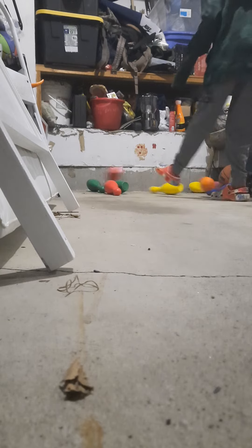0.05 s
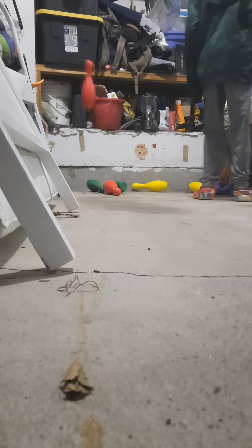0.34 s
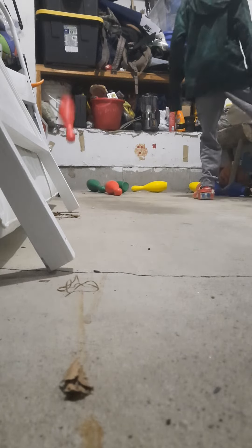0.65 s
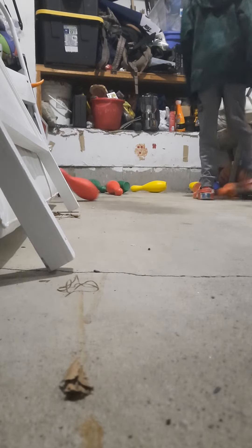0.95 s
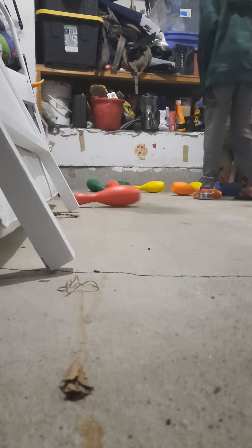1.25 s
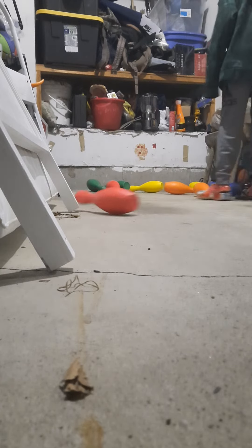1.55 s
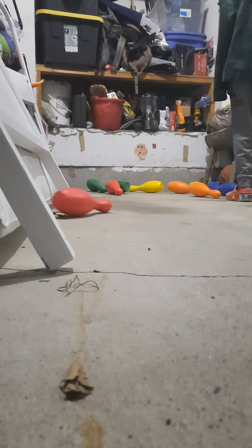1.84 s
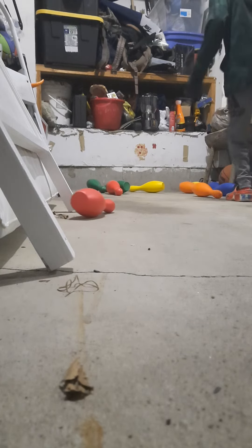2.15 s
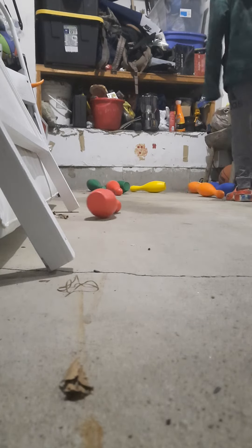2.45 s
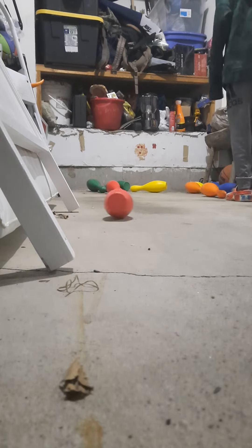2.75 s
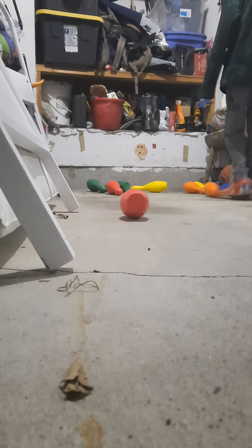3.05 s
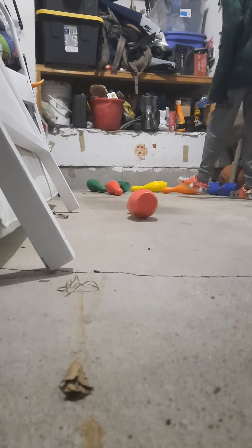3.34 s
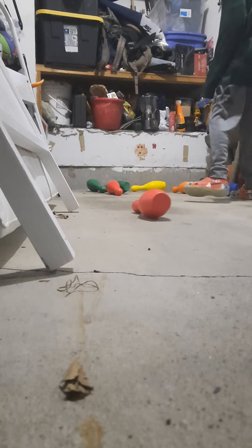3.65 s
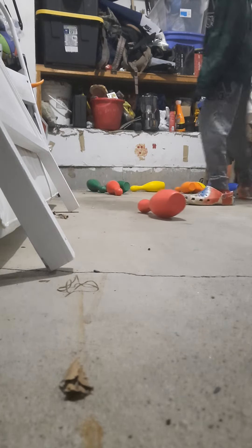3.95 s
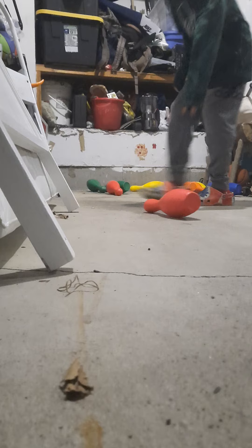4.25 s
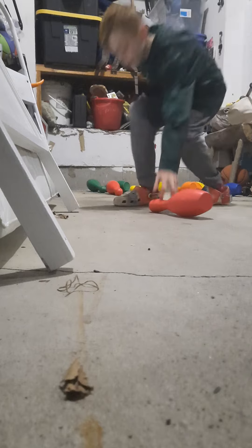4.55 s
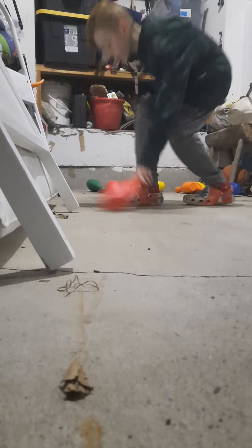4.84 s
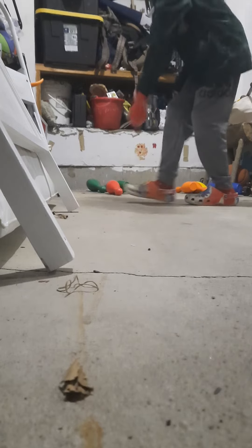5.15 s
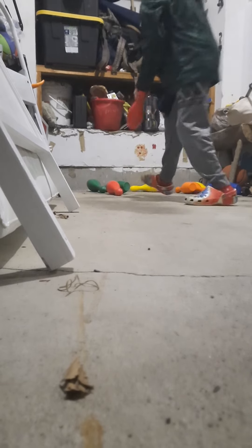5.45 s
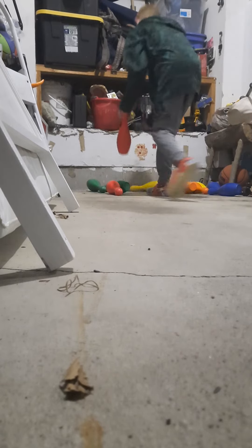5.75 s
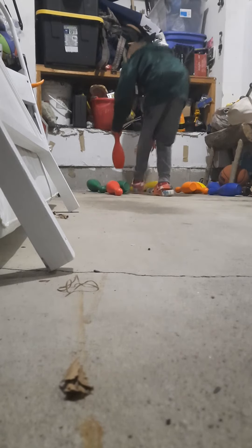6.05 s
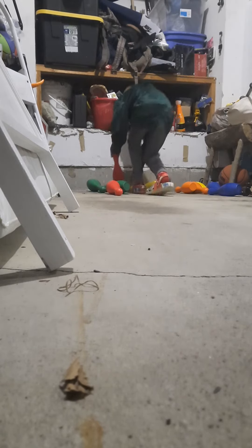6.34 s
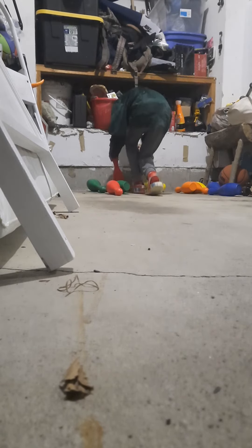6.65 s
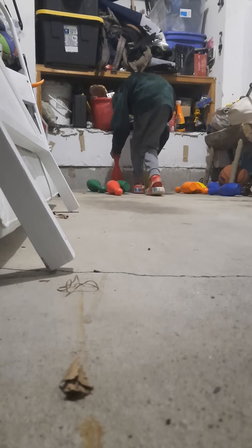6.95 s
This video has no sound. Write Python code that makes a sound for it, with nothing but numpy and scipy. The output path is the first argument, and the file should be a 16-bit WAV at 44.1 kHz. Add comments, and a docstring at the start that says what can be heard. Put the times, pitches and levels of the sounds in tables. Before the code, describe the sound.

Hollow plastic bowling pins knock and bounce on a concrete garage floor, with three sharp, booming tocks in the first half second and a gritty skid. Around 0.8 to 1.3 seconds comes another cluster of knocks with a loud scrape, then a pin rolls unevenly until about 2 seconds, tapping lightly. At 2.1 seconds a hard crack opens a quick, bright, ringing clatter, the loudest moment, with a rasping slide and sandy crunches until 2.5 seconds. Dull footsteps thud irregularly from about 1.3 seconds to the end, with soles scuffing the grit. Lighter pin knocks come near 3.2 and 4.5 seconds. From 5 seconds to about 7 there are only steps, soft shuffles and faint heel taps. The hard walls give everything a short echo, and a faint steady rush of air lies underneath.

```python
"""Hollow plastic bowling pins knock, bounce and skid as a child kicks them about a concrete garage.
Each impact excites a pin's thin wall and the air inside; one kick ends in a loud ringing clatter.
Soles and pins rasp over the gritty floor by friction; footsteps thud and heels tap on the slab.
The hard walls return every sound as early echoes and reverberation, over a faint rush of air."""
import sys
import numpy as np
from scipy import signal
from scipy.fft import rfft, irfft, next_fast_len
from scipy.io import wavfile

SR = 44100
rng = np.random.default_rng(int(sys.argv[2]) if len(sys.argv) > 2 else 0)


def materialize(psi):
    """Save the field psi as 16-bit PCM at rate SR to the path in sys.argv[1].

    A 1-D psi becomes a single channel; in a 2-D psi each row is a channel.
    """
    bounded = np.clip(np.atleast_2d(psi).T, -1, 1)
    quanta = np.round(bounded * 32767).astype(np.int16)
    wavfile.write(sys.argv[1], SR, quanta)


N = 308556


def amp(db):
    """Converts decibels to an amplitude ratio."""
    return 10 ** (np.asarray(db) / 20)


def unit(x):
    """Normalises to a mean energy of 1 per channel."""
    return x / np.sqrt(np.mean(np.sum(x ** 2, -1)) + 1e-20)


def curve_at(points, hz):
    """Interpolates a curve on a log-frequency axis."""
    knots_hz, values = np.transpose(points)
    return np.interp(np.log(hz + 1), np.log(knots_hz), values)


def add(mix, start_s, sound):
    """Superposition: a stereo sound sums into the mix from start_s."""
    part = mix[:, max(round(start_s * SR), 0):][:, :sound.shape[1]]
    part += sound[:, :part.shape[1]]


def equalise(x, spectrum):
    """Zero-phase filtering: each frequency changes in level without delay."""
    size = next_fast_len(len(x) + SR)
    gain = amp(curve_at(spectrum, np.fft.rfftfreq(size, 1 / SR)))
    return irfft(rfft(x, size) * gain, size)[:len(x)]


def colour(x, spectrum, top_hz=1e6, size=2048):
    """Minimum-phase filtering, rolling off above top_hz: ringing only follows its cause."""
    hz = np.fft.rfftfreq(size, 1 / SR)
    log_gain = np.log(amp(curve_at(spectrum, hz)) / np.sqrt(1 + (hz / top_hz) ** 4))
    mirrored = np.concatenate([log_gain, log_gain[-2:0:-1]])
    taps = np.fft.ifft(np.exp(np.conj(signal.hilbert(mirrored)))).real
    return signal.fftconvolve(x, taps)[:len(x)]


def pulse(hz, spread, order=1, size=16384):
    """Impulse response of a broad, heavily damped resonance: one brief contact."""
    edges_hz = np.clip([hz / (1 + spread), hz * (1 + spread)], 10, SR / 2 - 10)
    band = signal.butter(order, edges_hz, "band", fs=SR, output="sos")
    return unit(signal.sosfilt(band, signal.unit_impulse(size)))


def ring(modes, size=16384):
    """Free vibration as a sum of damped modes; each blow lands elsewhere and weights them anew."""
    t = np.arange(size) / SR
    vibration = np.zeros(size)
    for hz, level_db, t60_s in modes:
        envelope = amp(level_db + rng.normal(0, 1) - 60 * t / t60_s)
        vibration += envelope * np.sin(2 * np.pi * hz * t) * rng.choice([-1, 1])
    return unit(vibration)


# Reverberation time of the garage: frequency_hz, t60_s
REVERB_TIMES = [(80, 0.32), (250, 0.5), (700, 0.62), (2000, 0.47), (5000, 0.48), (9000, 0.34),
                (15000, 0.25)]
# Early reflections from the walls: delay_s, relative_gain
WALL_ECHOES = [(.0088, 0.24), (0.0141, 0.66), (0.0155, 0.71), (0.024, 0.32)]
def garage(x, direct_db, wall_db, pan_db=0, left_lead_s=.00025, build_s=0.0016, size=36000):
    """Room response by convolution: direct sound, reflections and a diffuse tail, new for each spot."""
    reflections = rng.choice([-1., 1.], (2, size)) * (rng.random((2, size)) < 0.1)
    hz, t, bands = signal.stft(reflections, SR, nperseg=256)
    decay = amp(-60 * t / curve_at(REVERB_TIMES, hz)[:, None])
    build_up = 1 - np.exp(-t / build_s)
    response = unit(signal.istft(bands * decay * build_up, SR, nperseg=256)[1])
    for channel, lag_s in enumerate([-left_lead_s, left_lead_s]):
        response[channel, max(round(SR * lag_s), 0)] += amp(direct_db)
        for delay_s, gain in WALL_ECHOES:
            arrival_s = abs(delay_s + rng.normal(0, .0003))
            response[channel, round(SR * arrival_s)] += gain * amp(wall_db)
    return signal.fftconvolve(x[None], unit(response), axes=1) * amp([[pan_db / 2], [-pan_db / 2]])


# Spectrum of the room's steady rush: frequency_hz, relative_db
AIR_SPECTRUM = [(25, -24), (50, -8), (75, 3.5), (110, -1), (160, -5), (215, -11.5), (320, 0.5), (450, -9),
                (700, -18.5), (1120, -16), (1400, -27.5), (2600, -32.5), (3600, -37.5), (15500, -36.5)]
def air(level_db=-58.5):
    """Ambient noise: a faint stationary rush, uncorrelated between the channels."""
    rush = np.array([equalise(noise, AIR_SPECTRUM) for noise in rng.standard_normal((2, N))])
    return amp(level_db) * np.sqrt(N) * unit(rush)


def thud(level_db, hz):
    """Soft impact: weight landing on the slab gives a low pulse that reverberation draws out."""
    push = amp(level_db) * pulse(hz, spread=0.5, order=2)
    return garage(push, direct_db=-8.5, wall_db=-11.5, build_s=0.036)


# Heel strikes: start_s, level_db, pitch_hz
HEEL_STRIKES = [(1.281, -24, 111.8), (1.581, -19.5, 116), (2.169, -16, 115), (2.362, -14, 91),
                (2.68, -19.5, 91.5), (2.8, -26.5, 90.6), (3.098, -16.5, 117), (3.32, -26, 128.5),
                (3.579, -23, 92.3), (3.9, -24.5, 98), (4.15, -16.5, 71.5), (4.564, -21.5, 103.9),
                (4.741, -27.5, 134), (5.199, -22, 138), (5.491, -18, 100), (5.632, -16.5, 89),
                (5.84, -23.5, 105.4), (6.15, -27.5, 123), (6.456, -15.5, 149), (6.9, -29, 137)]
def footsteps(toe_delay_s=0.054, toe_db=-3.5, toe_pitch_ratio=0.72):
    """Weight transfer in two impacts: the heel lands, then the toe, softer and lower."""
    out = np.zeros((2, N))
    for start_s, level_db, pitch_hz in HEEL_STRIKES:
        add(out, start_s, thud(level_db, pitch_hz))
        add(out, start_s + toe_delay_s, thud(level_db + toe_db, pitch_hz * toe_pitch_ratio))
    return out


def grains(length, per_s, spread_db):
    """Shot noise: tiny slips of uneven size at random instants."""
    sizes = amp(spread_db * np.minimum(rng.exponential(1, length), 5))
    return sizes * rng.standard_normal(length) * (rng.random(length) < per_s / SR)


# Spectra of rasping concrete and of crushed sand: frequency_hz, relative_db
SCRAPE_SPECTRUM = [(100, -19), (330, 2), (600, -4.5), (1100, -4.5), (1700, 1), (2600, 2), (3600, -6.5),
                   (5800, -1.5), (8000, -9.5), (16000, -24)]
GRIT_SPECTRUM = [(1500, -20.5), (3500, -11.5), (5800, -2), (7300, -10), (8400, -4.5), (9600, -7),
                 (12000, -2), (15800, -1.5)]
def rub(pressure, scrape_db, grit_db):
    """Friction noise follows the load: the surface rasps, sand fizzes and single grains crack."""
    n = len(pressure)
    # A faster slide lifts more sand and rasps brighter: one octave per 32 dB of grit.
    top_hz = 3600 * 2 ** ((grit_db + 47) / 32)
    slips = grains(n, per_s=5000, spread_db=3.5)
    scrape = amp(scrape_db) * unit(colour(slips, SCRAPE_SPECTRUM, top_hz))
    fizz = unit(grains(n, per_s=1700, spread_db=2.0))
    cracks = amp(-2.5) * unit(grains(n, per_s=54, spread_db=5.5))
    sand = fizz + cracks
    sand[0] += amp(-8)  # the first contact crushes a grain
    grit = amp(grit_db) * unit(colour(sand, GRIT_SPECTRUM))
    return garage((scrape + grit) * pressure * np.sqrt(n), direct_db=-5.5, wall_db=-6.5)


def stroke(initial, swell_s, fade_s):
    """Contact pressure: linear loading from its initial value to 1, then unloading to 0."""
    end_s = swell_s + fade_s
    return np.interp(np.arange(0, end_s, 1 / SR), [0, swell_s, end_s], [initial, 1, 0])


# Soles and pins sliding on concrete: peak_s, swell_s, fade_s, scrape_db, grit_db
SKIDS = [(.16, .15, 0.4, -40, -36.5), (.89, .11, 0.15, -26.5, -33), (1.04, .07, 0.39, -40, -46.5),
         (2.001, .11, 0.057, -36, -46), (2.139, .19, .13, -28.5, -29), (3.157, .06, .13, -46.5, -41.5),
         (3.32, .12, 0.41, -58.5, -56), (3.62, 0.27, 0.16, -60, -56.5), (3.93, 0.089, 0.28, -63, -62),
         (4.65, .12, 0.21, -56.5, -55.5), (4.87, .19, 0.1, -53, -39.5), (5.11, .14, 0.11, -61, -64.5),
         (5.43, .2, 0.41, -66.5, -68), (6.26, 0.19, .08, -62.5, -78), (6.48, .13, .13, -58.5, -67),
         (6.92, 0.18, 0.24, -55.5, -70)]
# A sole or pin landing on sand: start_s, fade_s, scrape_db, grit_db
LANDINGS = [(0, 0.094, -41, -40.5), (0.334, 0.096, -35.5, -47), (0.787, 0.093, -40, -49),
            (1.761, 0.21, -54, -48), (2.363, 0.059, -44, -43), (2.436, 0.078, -36, -33.5),
            (2.8, 0.1, -53.5, -59.5), (3.077, 0.066, -47, -53.5), (4.113, 0.121, -71, -51.5),
            (4.348, 0.16, -57, -49.5), (5.72, .14, -72, -65.5), (6.756, 0.19, -62, -60)]
# A pin rolling round on its belly: time_s, level_db
ROLL_LEVELS = [(1.28, -46), (1.352, -45), (1.462, -57.5), (1.638, -48), (1.814, -61), (1.85, -48),
               (1.906, -56), (1.94, -48)]
def friction():
    """Sliding and rolling friction: skids swell and fade, landings crunch at once, one pin rolls."""
    out = np.zeros((2, N))
    for peak_s, swell_s, fade_s, scrape_db, grit_db in SKIDS:
        pressure = stroke(0, swell_s, fade_s) ** 1.225  # builds slowly at first
        add(out, peak_s - swell_s, rub(pressure, scrape_db, grit_db))
    for start_s, fade_s, scrape_db, grit_db in LANDINGS:
        pressure = stroke(initial=1, swell_s=.008, fade_s=fade_s)
        add(out, start_s, rub(pressure, scrape_db, grit_db))
    times_s, levels_db = np.transpose(ROLL_LEVELS)
    peak_db = levels_db.max()
    t = np.arange(times_s[0], times_s[-1], 1 / SR)
    pressure = amp(np.interp(t, times_s, levels_db) - peak_db)
    add(out, times_s[0], rub(pressure, scrape_db=peak_db + 2.5, grit_db=peak_db - 4.5))
    return out


# Hard blows of the clatter: start_s, level_db
CLATTER_BLOWS = [(2.098, 8), (2.111, 0.5), (2.126, -2.5), (2.131, 9), (2.149, 5.5), (2.157, 7.5),
                 (2.176, 7), (2.198, 6.5), (2.210, 4.5)]
# Modes that the blows excite: pitch_hz, relative_db, t60_s
CLATTER_MODES = [(295, -3, .18), (331, -2, .18), (441, 1, .17), (520, -3, .07), (651, -7, .1),
                 (746, -2, .16), (835, -1, .14), (946, 0, .14), (1853, -5, .1), (2214, -7, .13),
                 (3067, 3, .22), (3112, 1, .22), (3207, 2, .24), (3349, 3, .28), (3838, -5, .1),
                 (4051, -5, .12), (4149, -3, .16), (4935, -7, .1), (5163, -6, .12)]
# Filter that colours each crack: frequency_hz, relative_db
CRACK_SPECTRUM = [(200, -16), (500, -8.5), (3000, -7.5), (5900, -6), (7000, -8.5), (8200, -7.5),
                  (9400, -14.5), (11500, -4.5), (16000, -14.5)]
def clatter(hardest_s=2.156, hard_width_s=0.032):
    """Contact hardness sets bandwidth: in a quick run of blows, the hardest crack and ring brightest."""
    out = np.zeros((2, N))
    low_modes = [mode for mode in CLATTER_MODES if mode[0] < 2000]
    bright_modes = [mode for mode in CLATTER_MODES if mode[0] >= 2000]
    for start_s, level_db in CLATTER_BLOWS:
        hardness = np.exp(-((start_s - hardest_s) / hard_width_s) ** 2)
        crack_hz = np.interp(hardness, [0, 1], [1740, 4900])
        crack = unit(colour(pulse(crack_hz, spread=0.27), CRACK_SPECTRUM))
        bright_ring = amp(-18.5 + 16 * hardness) * ring(bright_modes)
        low_ring = amp(-5 - 5 * hardness) * ring(low_modes)
        blow = amp(level_db) * (crack + bright_ring + low_ring)
        add(out, start_s, garage(blow, direct_db=-11.5, wall_db=-5.0, left_lead_s=-.00036))
    return out


# Pin knocks, then faint heel taps of shoes after 5 s; at 0.934 s, the bright peak of the loud scrape:
# start_s, level_db, tock_hz, boom_over_tock_db, left_over_right_db
KNOCKS_AND_TAPS = [(0.002, -5, 1160, 5, 0), (0.1331, 1.5, 1470, 3.5, 1.5), (0.3326, 1.5, 1128, 4.5, 0),
                   (0.776, -13.5, 1520, -7, 1.5), (0.866, -4.5, 594, 9.5, 7.5), (0.893, -2.5, 1206, 6.5, 0),
                   (0.934, -5, 2300, 1, 0), (1.022, -14, 1200, 7.5, -6), (1.1093, -6, 1074, 2, 5.5),
                   (1.2126, -13.5, 1720, 2.5, 0), (1.32, -15, 2313, -16, 0), (1.833, -18, 650, 0, 5),
                   (1.852, -13, 660, -1, 3), (2.0878, 11, 943, -26, 5), (3.152, -15.5, 688, 0.5, 0),
                   (3.866, -30, 985, 1.5, 1), (4.481, -8.5, 1220, -7, 0.5), (4.53, -20, 1620, -8, -2),
                   (5.025, -26, 1470, -13, -3), (5.247, -29.5, 696.6, 2.5, -4),
                   (5.741, -28.5, 1337, 1.5, -2.5), (6.232, -28, 1394, -2.5, -1),
                   (6.828, -24.5, 687, 3.5, -2.5), (6.897, -21.5, 880, -4, 5)]
# Air and wall modes of a pin: pitch_hz, relative_db, t60_s
PIN_MODES = [(243, -1, .19), (313, 0, .18), (160, -4, .05), (280, -2, .05), (385, -5, .05), (480, -3, .05),
             (665, -14, .1)]
# A pin lands on one end, then the other, then hops: delay_s, relative_db
PIN_BOUNCES = [(0, 0), (.016, -9), (.062, -13)]
# Spectrum of the contact snap: frequency_hz, relative_db
SNAP_SPECTRUM = [(500, -14), (1000, -6), (2500, -1), (4000, -3.5), (5600, -2.5), (6800, -12.5),
                 (9500, -17.5), (12000, -17.5), (16000, -13)]
def knocks_and_taps(slab_db=-7.5, slab_hz=125):
    """Impact and resonance: a contact snaps and thuds; a pin's wall tocks and its cavity booms."""
    out = np.zeros((2, N))
    for start_s, level_db, tock_hz, boom_db, pan_db in KNOCKS_AND_TAPS:
        tock = pulse(tock_hz, spread=0.48, order=2)
        for delay_s, bounce_db in PIN_BOUNCES:
            body = amp(level_db + bounce_db) * (tock + amp(boom_db) * ring(PIN_MODES))
            add(out, start_s + delay_s, garage(body, direct_db=-3, wall_db=-4.5, pan_db=pan_db))
        snap_db = min(-4.5 + 3.1 * level_db, 0)  # harder knocks snap more, up to a ceiling
        snap = amp(snap_db) * unit(colour(signal.unit_impulse(len(tock)), SNAP_SPECTRUM))
        # The snap beams along the floor, so more of it arrives directly.
        add(out, start_s, garage(snap, direct_db=-2.0, wall_db=-4.5, pan_db=pan_db, left_lead_s=.00004))
        add(out, start_s, thud(level_db + boom_db + slab_db, slab_hz))
    return out


def scene():
    """Linear superposition of all the sources in the garage."""
    return knocks_and_taps() + clatter() + friction() + footsteps() + air()


# Stereo width: frequency_hz, side_over_mid_db
STEREO_WIDTH = [(60, -16), (150, -10.5), (250, -12.5), (350, -10.5), (440, -2), (16000, 1)]
# Imbalance of the microphones: frequency_hz, left_over_right_db
MIC_BALANCE = [(300, 0), (600, -2), (1250, -6.5), (2400, -0.5), (4400, 0), (8000, 1.5), (11000, 6),
               (15000, 10.5)]
def record(dry, low_cut_hz=48, high_cut_hz=15950):
    """Two close, band-limited microphones share the long wavelengths and differ in the treble."""
    dry = signal.sosfilt(signal.butter(2, low_cut_hz, "high", fs=SR, output="sos"), dry)
    mid_curve = [(hz, 10 * np.log10(2 / (1 + amp(db) ** 2))) for hz, db in STEREO_WIDTH]
    side = equalise((dry[0] - dry[1]) / 2, STEREO_WIDTH)
    mid = equalise((dry[0] + dry[1]) / 2, mid_curve)  # rises where the side is cut
    left = equalise(mid + side, [(hz, db / 2) for hz, db in MIC_BALANCE])
    right = equalise(mid - side, [(hz, -db / 2) for hz, db in MIC_BALANCE])
    low_pass = signal.firwin(511, high_cut_hz, window=("kaiser", 9), fs=SR)
    return signal.oaconvolve(np.array([left, right]), low_pass[None], "same")


dry = scene()
out = record(dry)
materialize(out)
```